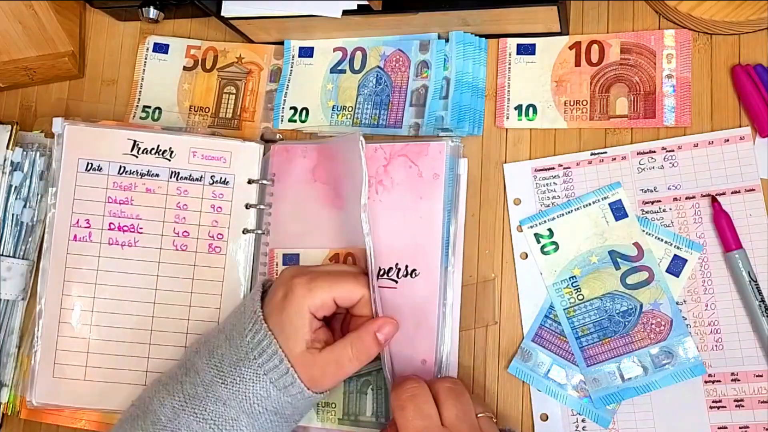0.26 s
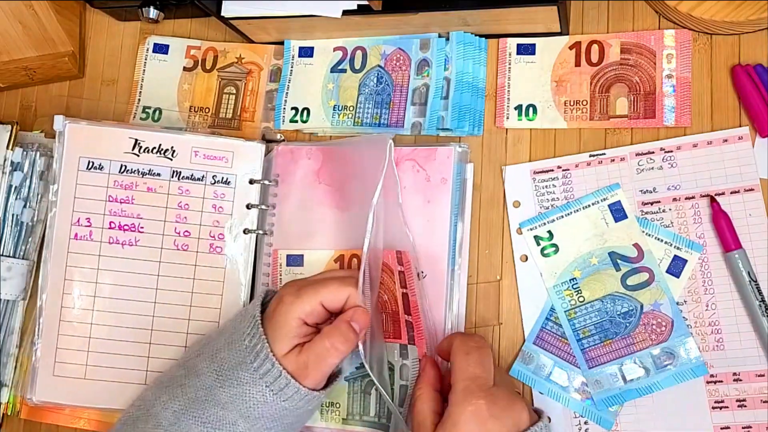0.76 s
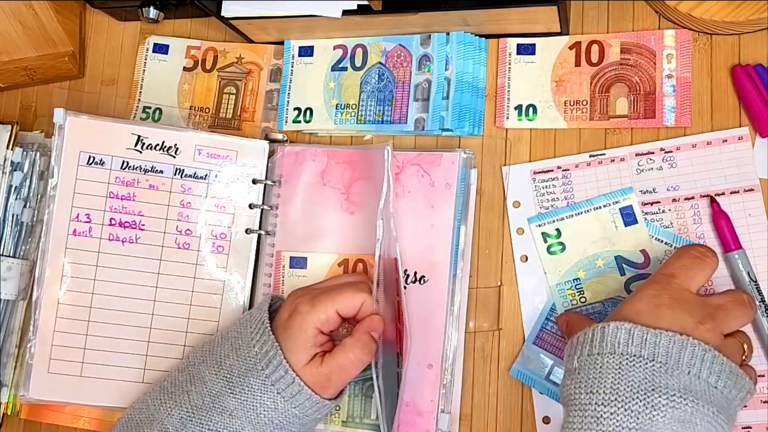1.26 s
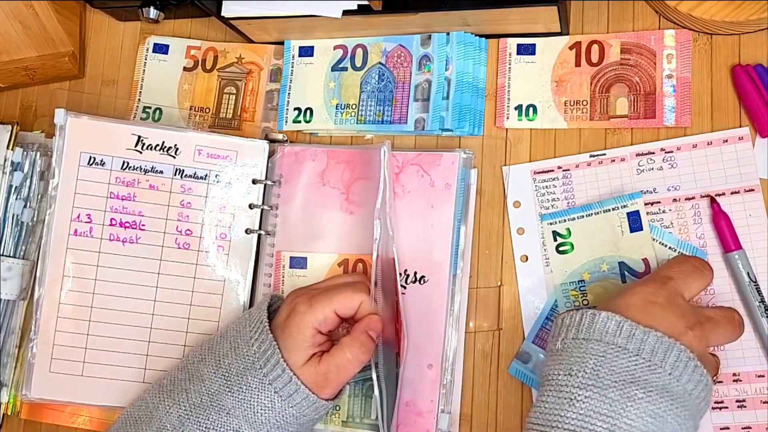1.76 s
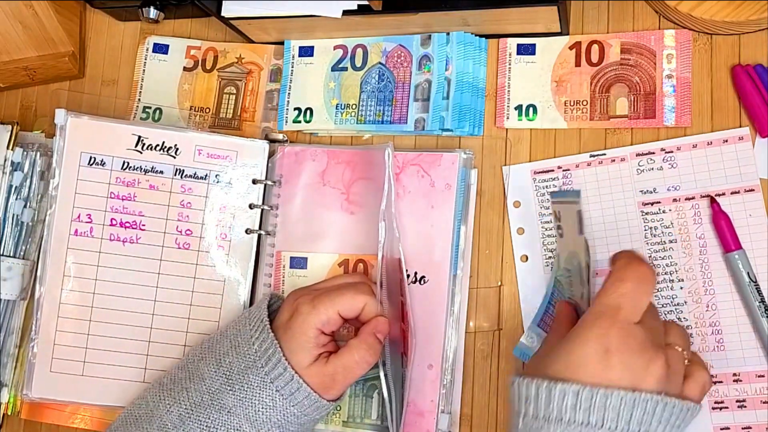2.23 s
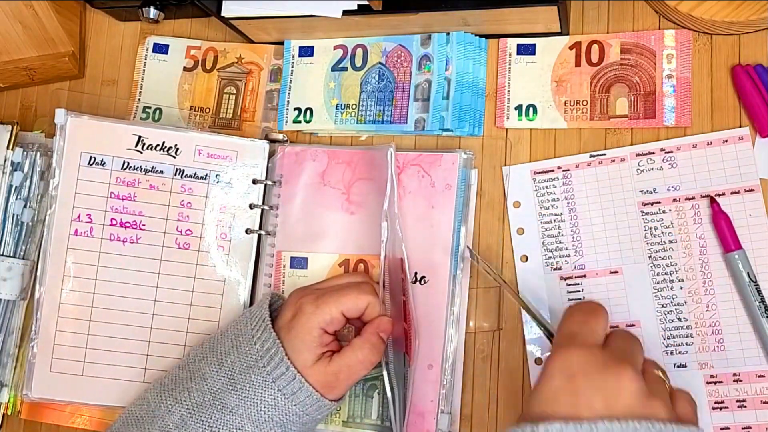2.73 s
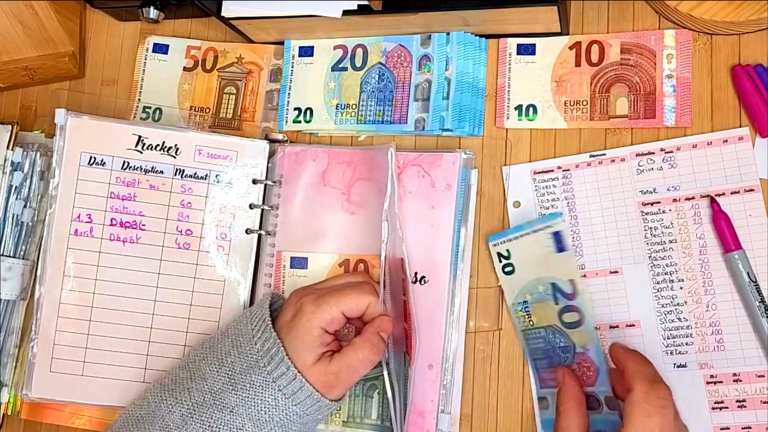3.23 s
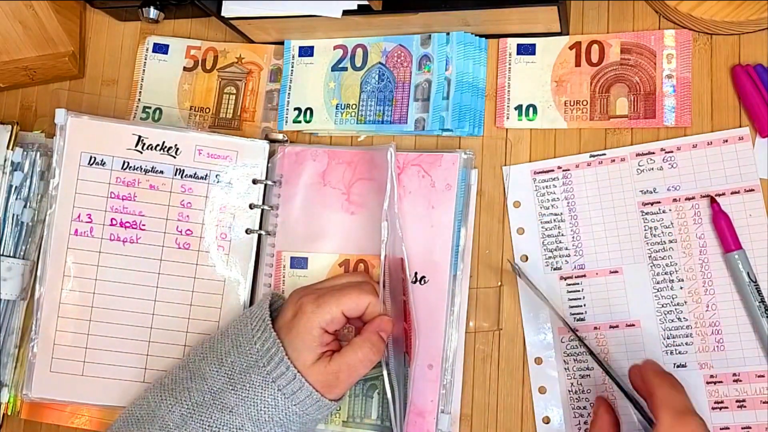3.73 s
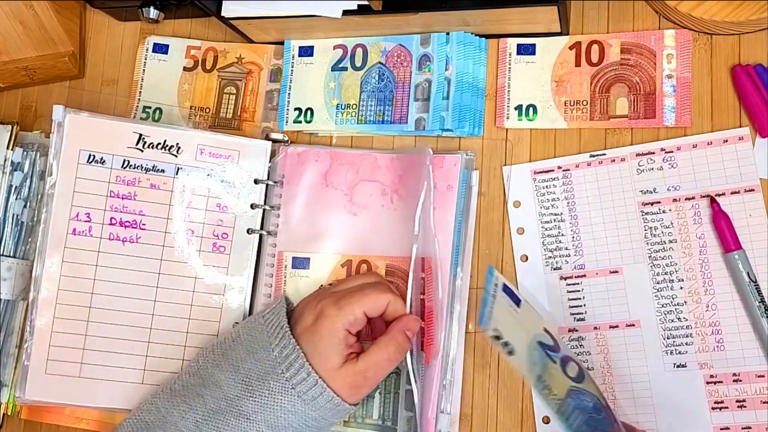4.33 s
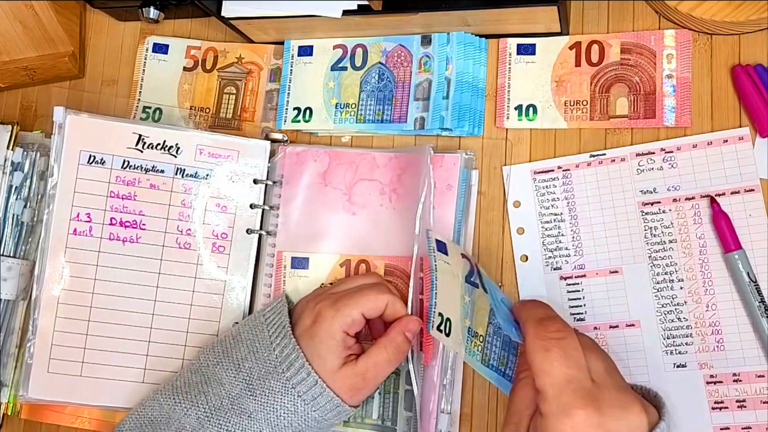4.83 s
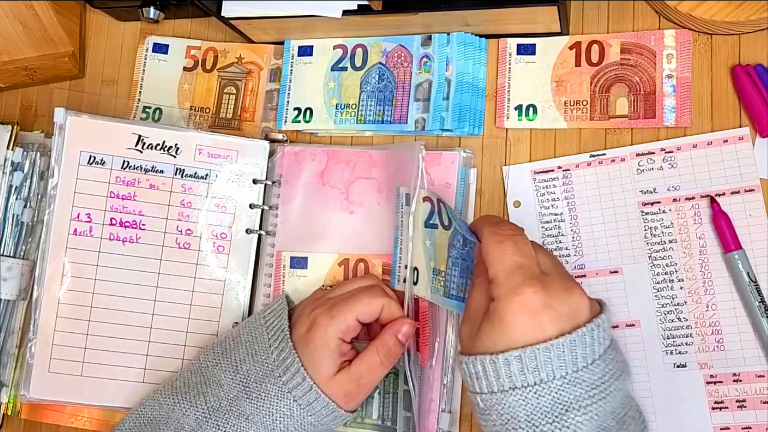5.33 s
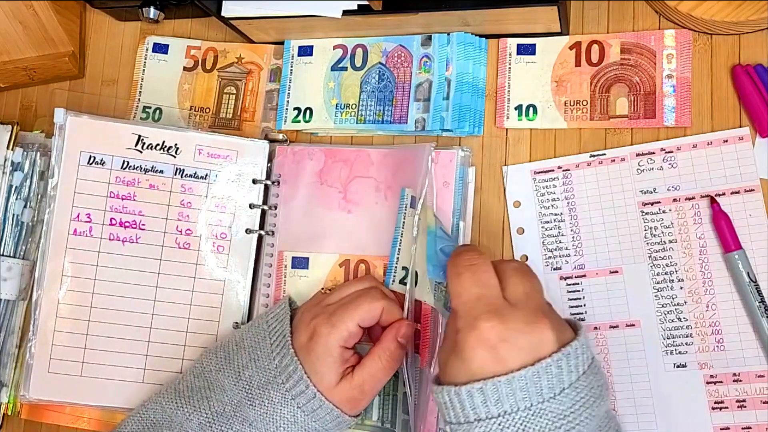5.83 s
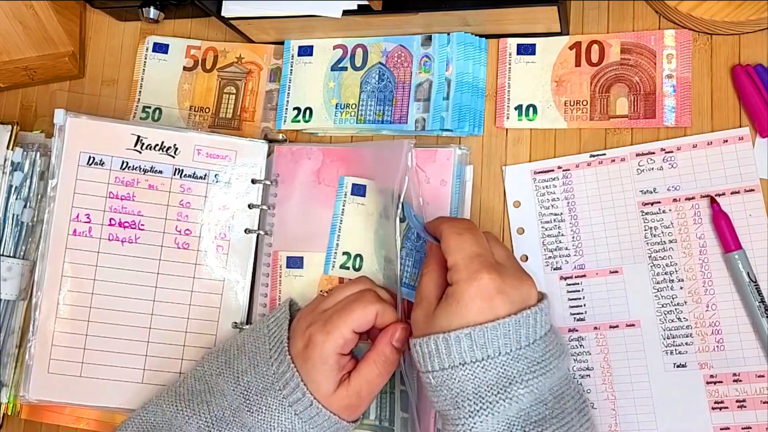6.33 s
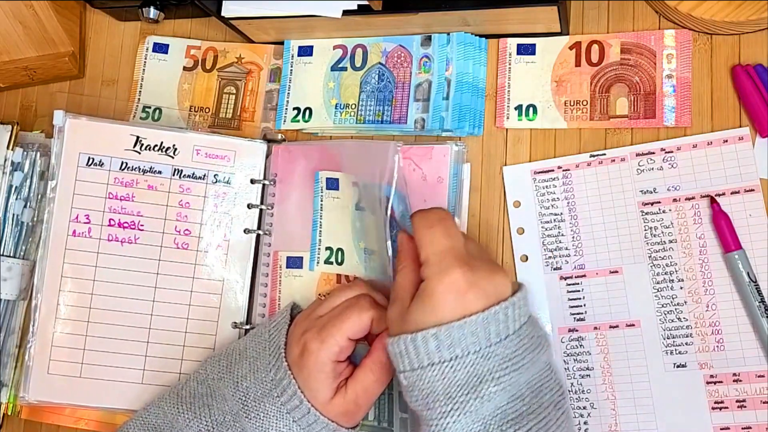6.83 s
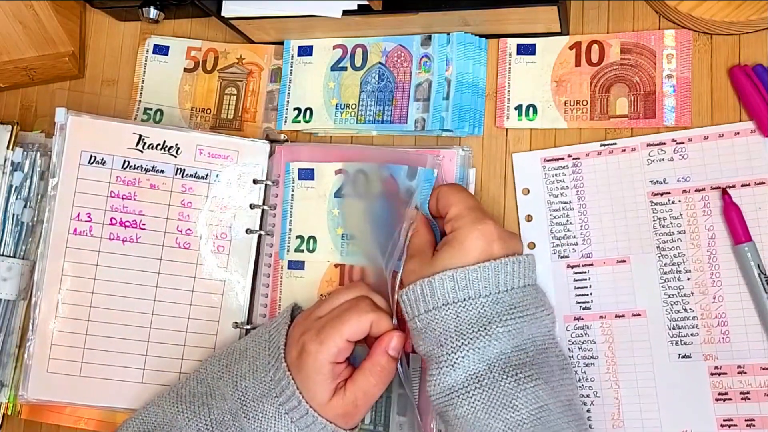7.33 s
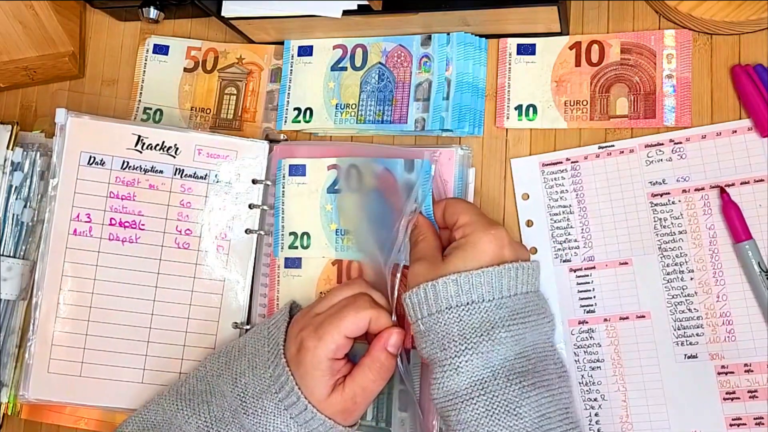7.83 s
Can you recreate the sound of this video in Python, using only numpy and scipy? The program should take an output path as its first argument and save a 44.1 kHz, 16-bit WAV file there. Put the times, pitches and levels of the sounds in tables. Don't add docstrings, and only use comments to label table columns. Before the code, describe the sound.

Close stereo microphone in a small quiet room. Faint sleeve brushing and plastic ticks come first, then banknotes are gathered with sharp snaps and a low desk knock that sets off a brief shuddering rattle. Handling thins to sparse crackles, then notes rub and slide into a plastic pocket with hollow crinkles and soft taps.

```python
import sys
import numpy as np
from scipy import signal
from scipy.fft import rfft, irfft, next_fast_len
from scipy.io import wavfile

SR = 44100
rng = np.random.default_rng(int(sys.argv[2]) if len(sys.argv) > 2 else 0)


def transcribe(signal):
    frames = np.atleast_2d(signal).T
    limited = np.clip(frames, -1, 1)
    pcm = np.round(limited * 32767).astype(np.int16)
    wavfile.write(sys.argv[1], SR, pcm)


def volts(x):
    e = np.asarray(x, float) / 20
    return 10 ** e


N = 355575

# (frequency [Hz], likeness [0-1])
LIKENESS = [(60, 0.83), (300, 0.94), (1000, 0.8), (2500, 0.51), (5000, 0.19), (10000, 0.1)]


def rms_one(x):
    return x / np.sqrt(np.mean(x ** 2) + 1e-20)


def in_time(rows):
    s, *columns = np.transpose(rows)
    return [np.interp(np.arange(N) / SR, s, c) for c in columns]


def at_hz(points, hz):
    table_hz, values = np.array(points)[:, 0], np.array(points)[:, 1]
    return np.interp(np.log(hz), np.log(table_hz), values)


def band(x, low_hz, high_hz):
    sos = signal.butter(2, [low_hz, min(high_hz, .45 * SR)], "band", fs=SR, output="sos")
    return signal.sosfilt(sos, x)


def resonance(x, hz, width_hz):
    r = np.exp(-np.pi * width_hz / SR)
    poles = [1, -2 * r * np.cos(2 * np.pi * hz / SR), r * r]
    return signal.lfilter(np.array([1, 0, -1]) * (1 - r * r) / 2, poles, x)


def drift(rate):
    r = np.exp(-80 * np.pi * rate / SR)
    slow = signal.lfilter([1], [1, -2 * r, r * r], rng.standard_normal(N // 40 + 2002))[2000:]
    return np.interp(np.arange(N) / 40, np.arange(len(slow)), rms_one(slow))


def swells(s, peak_db, rise_s, fall_s):
    loss_db = 20
    t = np.arange(0, N + 64, 64) / SR - np.c_[s]
    rising = -t / np.c_[np.maximum(rise_s, .01)]
    falling = t / np.c_[np.maximum(fall_s, .01)]
    slope = np.where(t < 0, rising, falling)
    power = np.sum(volts(np.c_[peak_db] - loss_db * slope) ** 2, axis=0)
    return np.interp(np.arange(N) / 64, np.arange(t.shape[1]), power)


def add(out, s, sound):
    start = round(s * SR)
    out[:, start:start + sound.shape[1]] += sound


def to_ports(three, hz):
    alike = np.clip(at_hz(LIKENESS, hz), 0, 1)
    return three * np.sqrt([[alike], [1 - alike], [1 - alike]])


def floor():
    # (frequency [Hz], density [dB per Hz])
    colour = [(70, 2.5), (134, -26), (193, -3.5), (357, -10.5), (2320, -20), (3530, -33.5), (7520, -24),
              (16000, -23)]
    floor_db = -66
    size = 2 * next_fast_len(N // 2 + 1)
    hz = np.maximum(np.arange(size // 2 + 1) * SR / size, 1)
    alike = np.clip(at_hz(LIKENESS, 3 * hz), 0, 1)
    shared, left, right = rfft(rng.standard_normal((3, size)))
    both = np.sqrt(alike) * shared + np.sqrt(1 - alike) * np.array([left, right])
    coloured = both * volts(at_hz(colour, hz)) * (hz > 125)
    return volts(floor_db - 5.5) * rms_one(irfft(coloured, size)[:, :N])


def room(x):
    t60_s, room_db = 0.15, -9
    t = np.arange(SR // 2) / SR
    tail = rng.standard_normal((2, len(t))) * volts(-60 * t / t60_s) * (t > .004)
    tail = signal.lfilter([1], [1, -.3], tail)
    tail /= np.sqrt(np.sum(tail ** 2, axis=1, keepdims=True))
    return volts(room_db) * signal.fftconvolve(x, tail, axes=1)[:, :N]


def rumble():
    # (peak time [s], peak level [dB], pitch [Hz], rise [s], fall [s])
    leans = [(.5, -49.5, 120, 0.24, 0.047), (1.71, -32, 118, 0.039, .5), (1.82, -40.5, 72, 0.12, 0.44),
             (2.42, -46, 38, 0.15, 0.1), (2.0, -48.5, 90, .3, 0.17), (2.469, -51.5, 109.4, 0.22, 0.17),
             (2.761, -46, 36.5, 0.42, 0.19), (4.622, -60.5, 62.3, 0.31, 0.53),
             (5.498, -55, 61.4, 0.99, 0.33), (6.037, -46, 64.7, 0.24, 0.055), (6.4, -57.5, 70, 0.68, 0.96),
             (7.25, -55, 50, 0.37, 0.28), (8.06, -64.5, 120, 0.37, .1)]
    still_db = [-71.5, -65, -68]
    db_per_octave = 15
    out = 0
    s, db, hz, rise, fall = np.transpose(leans)
    for rest_db, (low, high) in zip(still_db, [(25, 48), (52, 83.3), (90, 137.3)]):
        off_db = db_per_octave * np.abs(np.log2(np.sqrt(low * high) / hz))
        noise = rms_one(band(rng.standard_normal((3, N)), low, high))
        shared, left, right = to_ports(noise, low)
        level = np.sqrt(volts(rest_db) ** 2 + swells(s, db - off_db, rise, fall))
        out = out + level * (shared + np.array([left, right]))
    return out


def wobble():
    # (time [s], swing level [dB], rattle level [dB])
    sway = [
        (1.67, -55, -41),
        (1.735, -23.5, -31),
        (1.86, -27, -37.5),
        (1.983, -30, -45),
        (2.011, -35, -40.5),
        (2.065, -39.5, -46),
        (2.13, -37.5, -35.5),
        (2.33, -51.5, -60),
    ]
    # (multiple [of swing rate], level [dB])
    overtones = [(2, -21), (3, -16.5), (4, -31.5)]
    swing_hz = 39.8
    level_db, rattle_db = in_time(sway)
    t = np.arange(N) / SR
    start, end = sway[0][0], sway[-1][0]
    swinging = np.interp(t, [start, start + 0.0096, end - .05, end], [0, 1, 1, 0])
    turn = 2 * np.pi * swing_hz * t + 1.0 + 0.25 * np.sin(2 * np.pi * 4.5 * t)
    swing = np.sin(turn)
    for k, db in overtones:
        swing = swing + volts(db + 4.3 * drift(4.3)) * np.sin(k * turn + 4.17)
    shake = rng.standard_normal(N) * (1 + 0.14 * np.sin(turn))
    rattle = resonance(shake, 270, 50) + 0.12 * resonance(shake, 180, 80)
    rattle = rattle + 0.14 * resonance(shake, 450, 140) + 0.12 * resonance(shake, 600, 240)
    moving = np.sqrt(2) * volts(level_db) * swing + volts(rattle_db - 11.0) * rms_one(rattle)
    return swinging * moving * volts([[-1.5], [1.5]])


def taps():
    # (time [s], peak level [dB], ring [Hz], t60 [s])
    dull_taps = [(0.192, -40, 379, 0.15), (0.422, -41.5, 876, 0.12), (0.435, -39.5, 327, 0.08),
                 (0.755, -35.5, 354, 0.21), (1.552, -40.5, 149, 0.11), (1.56, -31, 810, 0.057),
                 (2.005, -35, 560, .08), (.794, -45, 310, .15), (2.624, -24, 890, 0.044),
                 (4.86, -57.5, 900, 0.084), (5.46, -30, 370, 0.087), (5.472, -29.5, 520, 0.032),
                 (4.434, -31.5, 914, 0.092), (4.702, -43, 883, 0.048), (4.984, -38.5, 820, 0.13),
                 (5.456, -23.5, 586, 0.12), (6.484, -41.5, 695, 0.08), (6.889, -31.5, 720, 0.037),
                 (7.143, -31, 690, 0.069), (7.151, -33.5, 384, 0.028), (7.955, -37, 415, 0.029),
                 (7.997, -40.5, 330, 0.036)]
    # (time [s], peak level [dB], ring [Hz], t60 [s])
    fold_rings = [(1.3438, -18, 2600, 0.047), (2.003, -16, 1300, 0.023), (2.004, -14, 3300, .05),
                  (3.6275, -32, 1930, 0.036), (4.4345, -30, 2700, .02), (.4245, -31.5, 1570, 0.036),
                  (.7025, -26, 5520, 0.012), (.543, -32, 5000, .012), (4.702, -24, 3020, 0.022),
                  (6.891, -33, 1300, 0.022), (7.144, -25.5, 1560, 0.033), (7.1445, -34, 2200, .03),
                  (6.485, -42, 1950, .03), (6.891, -34, 3800, .015)]
    modes = [(1, 1), (1.24, -.5), (.83, .35), (1.9, .3)]
    size = SR // 5
    out, t = np.zeros((3, N + size)), np.arange(size) / SR
    for s, peak_db, hz, t60 in dull_taps + fold_rings:
        scuff = 0.14 * rng.standard_normal(size) * volts(-60 * t / t60)
        push = np.sin(np.pi * np.minimum(t * hz * 2, 1)) + scuff
        ring = 0
        for ratio, gain in modes:
            width_hz = 1.96 * ratio * np.log(1000) / np.pi / t60
            ring = ring + gain * resonance(push, ratio * hz, width_hz)
        ring = band(ring, 0.24 * hz, 4 * hz)
        three = ring / np.abs(ring).max() * np.array([[1], [1], [-.6]])
        add(out, s, volts(peak_db + 0.5) * to_ports(three, hz / 2))
    return out[:, :N]


def ticks():
    # (time [s], peak level [dB], pitch [Hz], width [share of pitch])
    pops = [(.391, -41, 6000, 0.66), (.614, -48, 6000, .6), (.635, -40, 6400, .4), (.92, -50, 7000, .4),
            (.976, -35, 1880, 0.48), (1.3375, -23, 5500, .6), (1.399, -38, 1500, .5),
            (1.424, -36, 1200, .5), (1.446, -37, 1300, .6), (1.555, -16, 5450, .7),
            (1.570, -20, 2000, 0.81), (1.6465, -22.5, 4600, 0.27), (1.655, -32, 5000, .8),
            (1.861, -32, 1300, 0.54), (1.876, -37, 1100, .5), (2.0053, -12, 7000, 0.27),
            (2.0935, -17, 1300, .5), (2.098, -15, 6000, .9), (2.1, -19, 1750, .4), (2.1225, -22, 4900, .2),
            (2.139, -21, 5700, .3), (2.255, -31, 4500, 0.36), (2.2824, -39, 5590, .5),
            (2.376, -30, 7000, .8), (2.6249, -15.5, 5530, 0.87), (2.747, -44, 3100, .3),
            (3.152, -35, 2200, .5), (3.207, -39, 7000, .8), (3.255, -26.5, 2050, 0.69),
            (3.293, -40.5, 890, 0.3), (3.378, -44, 940, .3), (3.6618, -21, 7450, 0.62),
            (3.675, -24, 9000, .9), (4.0715, -33, 10500, 0.55), (4.399, -38, 3580, 0.18),
            (4.453, -31, 2500, .8), (4.97, -49.5, 895, .4), (4.975, -39.5, 7500, .6),
            (4.9975, -26.5, 5500, 0.63), (5.033, -47, 2200, 0.86), (5.13, -48.5, 800, 0.53),
            (5.362, -34, 2100, .15), (5.434, -32.5, 1050, 0.46), (6.006, -43, 4130, 0.13),
            (6.382, -40, 990, 0.65), (6.762, -50.5, 1140, .2), (6.3, -41, 5800, .07),
            (6.891, -25, 3000, 1.3), (7.345, -44, 3700, 0.44), (7.951, -43, 960, 0.26),
            (7.958, -34, 2500, 0.97)]
    size = SR // 50
    out, click = np.zeros((3, N + size)), np.eye(1, size) * np.array([[1], [.8], [.3]])
    for s, peak_db, hz, share in pops:
        width = hz * np.clip(share, .05, 1.2)
        pop = resonance(resonance(click, hz, width), 1.04 * hz, width)
        add(out, s, volts(peak_db) * to_ports(pop / np.abs(pop).max(), hz))
    return out[:, :N]


def crackle(per_s, spread_db, grain_s):
    born = rng.random(N) < per_s * volts(5 * drift(12)) / SR
    sizes = volts(spread_db * np.minimum(rng.exponential(1, N), 3))
    slips = signal.lfilter([1], [1, -np.exp(-1 / (grain_s * SR))], born * sizes)
    return rms_one(1.55 + slips)


def scratches():
    # (time [s], rms level [dB], pitch [Hz], width [Hz], length [s])
    scrapes = [(.96, -45, 1760, 900, 0.025), (1.24, -50.5, 1250, 1300, .095), (1.347, -48, 2820, 300, 0.12),
               (1.393, -39, 1250, 900, 0.013), (1.675, -40.5, 637, 90, 0.042), (1.68, -39, 387, 120, 0.064),
               (1.728, -43.5, 278, 22, .2), (2.193, -49, 4930, 2000, 0.065),
               (2.284, -46, 5800, 3000, 0.045), (2.623, -35.5, 760, 400, 0.021),
               (2.74, -60, 7600, 2000, 0.041), (2.776, -53, 1207, 1522, 0.028),
               (3.101, -43, 11500, 7000, 0.117), (3.114, -50, 2200, 900, 0.093),
               (3.241, -57, 1900, 800, 0.056), (3.268, -56, 930, 200, 0.13), (3.658, -46, 1200, 700, 0.042),
               (3.84, -67.5, 8000, 5040, 0.065), (4.395, -49.5, 1510, 60, 0.022),
               (4.701, -51, 2900, 400, 0.041), (5.095, -60, 2100, 400, 0.032),
               (5.31, -42, 2100, 300, 0.091), (5.334, -43, 2480, 250, 0.037),
               (5.399, -46.5, 910, 300, 0.034), (5.75, -52, 740, 201, 0.057),
               (5.761, -45, 1780, 700, 0.048), (5.919, -55, 740, 150, 0.089),
               (5.977, -52.5, 2000, 400, 0.11), (6.199, -41, 2250, 700, 0.17),
               (6.197, -48, 1190, 400, 0.11), (6.36, -52.5, 784, 300, 0.06),
               (6.605, -44.5, 2070, 450, 0.072), (6.902, -54, 2160, 500, 0.15),
               (7.147, -39.5, 620, 300, 0.024), (7.148, -50.5, 2140, 1190, 0.032),
               (7.221, -60, 1830, 200, 0.13), (7.304, -48.5, 1950, 500, 0.056),
               (7.288, -55, 1010, 250, 0.11), (7.96, -51, 370, 121, 0.026)]
    edge_share = 0.18
    size = SR // 4
    out, t = np.zeros((3, N + size)), np.arange(size) / SR
    jerks = np.resize(crackle(per_s=300, spread_db=4.0, grain_s=0.001), N + size)
    for s, level_db, hz, width_hz, length in scrapes:
        held = np.clip(np.minimum(t, length - t) / (edge_share * length), 0, 1)
        friction = rng.standard_normal((3, size)) * jerks[round(s * SR):][:size]
        noise = rms_one(resonance(resonance(friction, hz, width_hz), hz, 2 * width_hz))
        add(out, s, volts(level_db) * to_ports(held * noise, hz))
    return out[:, :N]


def sheet(burst, peak_db, low_db, high_db):
    part_db = peak_db + np.array([low_db, 0, high_db])
    return (volts(part_db)[:, None, None] * burst).reshape(9, -1)


def flexed(pushes):
    body = volts(9.0) * to_ports(band(band(pushes[:3], 368, 1305), 190, 2100), 600)
    face = volts(1.0) * to_ports(band(band(pushes[3:6], 700, 4400), 500, 7530), 3900)
    edge = volts(-3.0) * to_ports(band(band(pushes[6:], 4800, 13500), 4100, 28000), 11000)
    stiff = resonance(pushes[3:6] + 0.47 * pushes[6:], 4090, 1400)
    return body + face + edge + volts(-10.0) * to_ports(stiff, 1600)


def snaps():
    # (time [s], peak level [dB], brightness [dB], t60 [s])
    cracks = [(0.4235, -31, -12, 0.19), (0.5427, -50.5, 17.5, 0.088), (0.669, -74, 31, 0.12),
              (0.7021, -57.5, 33.5, 0.018), (1.138, -70.5, 18.5, 0.17), (1.338, -36.5, 5, 0.29),
              (1.3436, -23, -1, 0.078), (1.396, -32.5, -19, 0.16), (1.421, -53, -11, .096),
              (1.6452, -28.5, -4, 0.1), (1.7392, -39, -13.5, 0.075), (1.9184, -36.5, 5.5, 0.36),
              (2.0034, -13.5, -2.5, 0.082), (2.093, -11.5, -12, 0.14), (2.12, -23, -19, 0.074),
              (2.1473, -17, 5.5, 0.066), (2.251, -33, 0, 0.055), (2.9293, -59, 4.5, 0.16),
              (3.0938, -54, 12, 0.14), (3.2136, -32.5, 3, 0.13), (3.3217, -36.5, -3.5, 0.36),
              (3.448, -37.5, -9, 0.13), (4.9838, -32.5, -5.5, 0.11), (5.458, -16.5, 2, 0.033),
              (5.571, -62, 14, 0.055), (6.4836, -43, -3, 0.11), (6.892, -29, -5.5, 0.027),
              (7.9566, -41, -12.5, 0.32)]
    # (time [s], peak level [dB], brightness [dB], t60 [s])
    folds = [(0.016, -41.5, -9, 0.14), (0.0907, -64, 14.5, .12), (0.246, -54.5, 12, 0.17),
             (0.753, -49, -4, 0.25), (0.946, -49.5, -6, 0.13), (1.2477, -50, 1.5, 0.13),
             (1.293, -51, 7, 0.14), (1.5684, -22, -18, 0.068), (1.857, -35.5, -1.5, 0.29),
             (2.372, -42, 14, 0.12), (2.6224, -26, 1.5, 0.21), (3.3833, -39, 3, 0.045),
             (3.6271, -42, 6, 0.14), (3.6608, -36.5, 7, 0.073), (3.675, -39.5, 3.5, 0.13),
             (4.395, -42.5, 6, 0.12), (4.4344, -32, -11, 0.21), (4.996, -35.5, -5, 0.12),
             (5.054, -49.5, 6, 0.25), (5.4319, -43.5, 7, 0.14), (5.4716, -20, -21, 0.016),
             (7.1445, -48, -19, 0.25), (7.9978, -55.5, -20, 0.15)]
    # (time [s], peak level [dB], brightness [dB], t60 [s])
    shivers = [(.1945, -44, -7, 0.11), (.39, -52.5, -1, 0.41), (1.531, -32, -0.5, 0.28),
               (1.5497, -10.5, -2.5, 0.082), (2.08, -32, 6, 0.17), (2.087, -19, 6.5, 0.085),
               (2.6023, -32, 0, 0.43), (2.945, -59.5, 13.5, 0.19), (3.1035, -56, 22, 0.19),
               (4.0086, -55.5, 9, 0.37), (4.4511, -47, 4, 0.24), (4.7023, -37.5, -5.5, 0.14),
               (4.9694, -46, 0, 0.06), (5.702, -45, 6.5, 0.47), (6.8156, -43.5, 3.5, 0.32)]
    # (low part [dB], crack over shiver [dB], attack [s])
    kinds = [
        (-15.5, 4.5, 0.00036),
        (-3, 3.5, 0.00078),
        (-16.5, -8, 0.0036),
    ]
    # (time [s], peak level [dB], low part [dB], high part [dB], length [s])
    slides = [
        (0.95, -47, 0.5, -2, 0.079),
        (2.344, -36.5, -9.5, -9, 0.074),
        (3.101, -58.5, -2, 21.5, 0.12),
        (4.162, -45, -11, 6, 0.036),
        (5.284, -30.5, -13, -2, 0.21),
        (5.734, -37, -1.5, 1.5, 0.099),
        (6.175, -30.5, -10, -5, 0.19),
        (6.596, -32.5, -13.5, -1, 0.11),
        (7.279, -43.5, -46, -1, 0.13),
    ]
    # (time [s], peak level [dB], low part [dB], high part [dB], length [s])
    scuffs = [
        (1.237, -60.5, 9, -6, 0.076),
        (1.686, -59, 14.5, -16, 0.13),
        (7.004, -38.5, -14.5, -5, 0.11),
        (7.942, -52.5, 7.5, -33.5, 0.05),
    ]
    size = SR // 5
    pushes, t = np.full((9, N + size), 1e-18), np.arange(size) / SR
    lumps = np.resize(crackle(per_s=190, spread_db=5.0, grain_s=0.00057), N + size)
    creases = [row + kind for rows, kind in zip([cracks, folds, shivers], kinds) for row in rows]
    crack_shape = np.minimum(t / 0.0004, 1) * np.exp(-np.minimum(t / 0.00069, 40))
    for s, peak_db, high_db, t60, low_db, crack_db, attack_s in creases:
        noise = rng.standard_normal((3, size))
        crack = volts(crack_db + 6.5) * np.sign(noise) * crack_shape
        dying = volts(-60 * t / np.clip(t60, .02, .3)) * np.minimum(t / attack_s, 1)
        shiver = noise * lumps[round(s * SR):][:size] * dying
        add(pushes, s, sheet(crack + shiver, peak_db, low_db, high_db))
    for s, peak_db, low_db, high_db, length in slides + scuffs:
        swell = np.sin(np.pi * np.minimum(t / length, 1) ** 0.67) ** 1.3
        slide = swell * lumps[round(s * SR):][:size] * rng.standard_normal((3, size))
        add(pushes, s, sheet(slide, peak_db, low_db, high_db))
    return flexed(pushes[:, :N])


def wrinkles(level_db):
    born = rng.random(N) < 220 * volts(5 * drift(9)) / SR
    pops = born * volts(4 * np.minimum(rng.exponential(1, N), 3)) + 1e-18
    pitches, dealt = np.geomspace(700, 6500, 12), rng.integers(0, 12, N)
    rings = 0
    for k, hz in enumerate(pitches):
        ring = resonance(pops * (dealt == k) + 1e-18, hz, 0.053 * hz)
        rings = rings + ring * (2000 / hz) ** 1.3
    return volts(level_db - 4.5) * rms_one(rings) * np.array([[.9], [.4], [-.4]])


def rub_levels():
    # (peak time [s], peak level [dB], brightness [dB], rise [s], fall [s])
    note_strokes = [(1.301, -60.5, 6.5, 0.042, 0.79), (1.43, -63, -17, 0.12, 0.99),
                    (1.76, -58, -26, .2, 0.91), (1.911, -63, -10, 0.2, .45), (2.16, -43, 5, 0.12, 0.15),
                    (2.371, -56, 6.5, 0.35, 0.0095), (2.778, -60, 12, 0.21, 0.03),
                    (3.201, -70, 23, 0.087, 0.061), (3.3, -55, -5, 0.17, 0.15),
                    (3.509, -67.5, 11, .15, 0.058), (4.059, -77.5, -1, 0.38, 0.26),
                    (4.34, -66, 8, 0.33, 0.29)]
    # (peak time [s], peak level [dB], brightness [dB], rise [s], fall [s])
    film_strokes = [(0.0, -58, -3, .1, 0.16), (.23, -61, -2, 0.12, 0.048), (.6, -81, 16, 0.34, 0.28),
                    (.88, -76, 7, 0.57, 0.31), (5.03, -63, -5.5, 0.033, 0.54),
                    (5.15, -69.5, 14.5, 0.034, 0.98), (5.4, -52.5, 2, 0.24, 0.22),
                    (5.655, -73, 13, 0.2, 0.06), (6.002, -50, 0, .11, 0.24), (6.325, -48, -2, 0.32, 0.16),
                    (6.55, -83.5, 22.5, 1, 0.22), (6.74, -61.5, -6, 0.36, 0.04),
                    (6.931, -48, 0, 0.11, 0.16), (7.33, -59.5, -4.5, 0.39, 0.14),
                    (7.48, -69.5, 9, 0.2, 0.44)]
    # (peak time [s], peak level [dB], rise [s], fall [s])
    brushes = [(0.0, -56, .1, 0.65), (.45, -66, 0.38, 0.29), (.88, -63, 0.34, 0.14),
               (1.3, -43, 0.051, 0.13), (1.692, -40, 0.045, 0.39), (2.39, -59, 0.25, 0.11),
               (2.779, -58.5, 0.22, 0.26), (3.33, -55.5, 0.041, 0.14), (3.51, -57.5, 0.073, 0.041),
               (4.06, -68.5, 0.14, 0.45), (4.33, -63, 0.13, 0.34), (5.4, -51, 0.2, 0.22),
               (5.97, -56, 0.13, 0.33), (6.4, -60, 0.18, 1), (7.37, -53.5, 0.31, .11),
               (7.75, -64.5, 0.17, 0.44)]
    rest_db = [-80.5, -90, -84.5]
    body_db = -4.5
    s, db, bright_db, rise, fall = np.transpose(note_strokes + film_strokes)
    low = swells(s, db + body_db, rise, fall) + swells(*np.transpose(brushes))
    power = [low, swells(s, db, rise, fall), swells(s, db + bright_db, rise, fall)]
    return 10 * np.log10(power + volts(np.c_[rest_db]) ** 2)


def rubbing(levels):
    centres_hz = [450, 2000, 8000]
    # (frequency [Hz], half-octave band against its level [dB])
    colour = [(180, -23.5), (300, -6), (600, -6.5), (1200, -2), (3600, 2), (6500, -2), (9000, 1),
              (13000, 2.5)]
    edges = 150 * 2 ** np.arange(0, 7.1, .5)
    slips = [crackle(per_s=140, spread_db=2.0, grain_s=0.0009) for part in range(2)]
    white = rng.standard_normal((2, 3, N))
    out, together = 0, drift(22)
    for k, (low, high) in enumerate(zip(edges, edges[1:])):
        hz = np.sqrt(low * high)
        weights = [np.interp(np.log(hz), np.log(centres_hz), one) for one in np.eye(3)]
        level_db = np.dot(weights, levels) + at_hz(colour, hz)
        flicker_db = 2.35 * together + 2.0 * drift(5.9)
        grains = rms_one(band(white[k % 2] * slips[k // 9], low, high))
        out = out + volts(level_db + flicker_db) * to_ports(grains, hz)
    return out


def placed(three):
    # (time [s], lag of left [samples], left over right [dB], share of the pocket [0-1])
    hands_path = [
        (0, 5, 0, 0.05),
        (.9, 0.5, 0, 0.1),
        (1.1, 7, -1, 0),
        (4.6, 7.5, -1, 0.12),
        (5.0, 1, 1, 0.01),
        (6.0, 0.5, 1, 1),
        (8.1, -4.5, -1, 0),
    ]
    # (frequency [Hz], width [Hz], level [dB])
    pocket_modes = [(748, 89, -2.5), (1268, 100, -2), (1970, 86, -0.5), (2350, 110, -14.5)]
    # (frequency [Hz], width [Hz], share [0-1])
    gap_hz, gap_width_hz, gap_share = (1600, 300, 0.37)
    lag, pan_db, pocket = in_time(hands_path)
    pocket = np.clip(pocket, 0, 1)
    three = three + pocket * sum(volts(db) * resonance(three, hz, w) for hz, w, db in pocket_modes)
    three = three - pocket * gap_share * resonance(three, gap_hz, gap_width_hz)
    left = np.interp(np.arange(N) - np.round(lag), np.arange(N), three[0])
    return np.array([(left + three[1]) * volts(pan_db / 2), (three[0] + three[2]) * volts(-pan_db / 2)])


def scene():
    levels = rub_levels()
    hands = placed(rubbing(levels) + wrinkles(levels[1]) + snaps() + taps() + ticks() + scratches())
    return hands + room(hands) + wobble() + rumble() + floor()


def band_limit(x):
    return signal.sosfilt(signal.butter(12, 16990, fs=SR, output="sos"), x)


def record(dry):
    # (frequency [Hz], width [Hz], share added or taken away [factor])
    ports = [(3577, 300, -0.21), (7260, 3600, 0.69), (9000, 5500, -0.42)]
    cutoff_hz = 16800
    for hz, width_hz, share in ports:
        dry = dry + share * resonance(dry, hz, width_hz)
    dry = .9 * np.tanh(dry / .9)
    cut = signal.sosfilt(signal.cheby2(10, 50, cutoff_hz, fs=SR, output="sos"), dry)
    return band_limit(cut)


dry = scene()
out = record(dry)
transcribe(out)
```